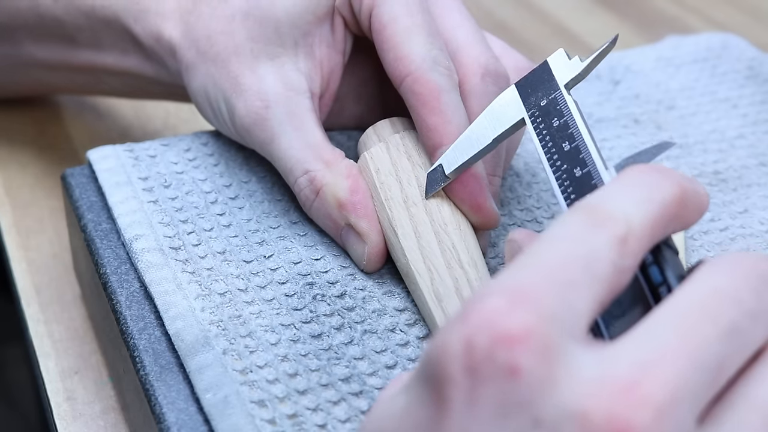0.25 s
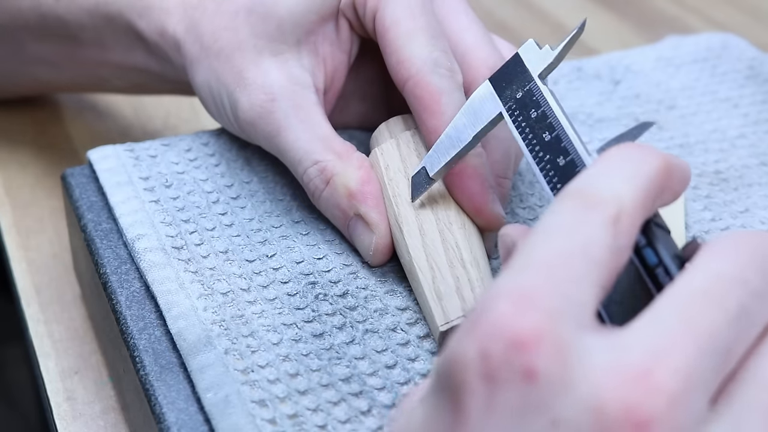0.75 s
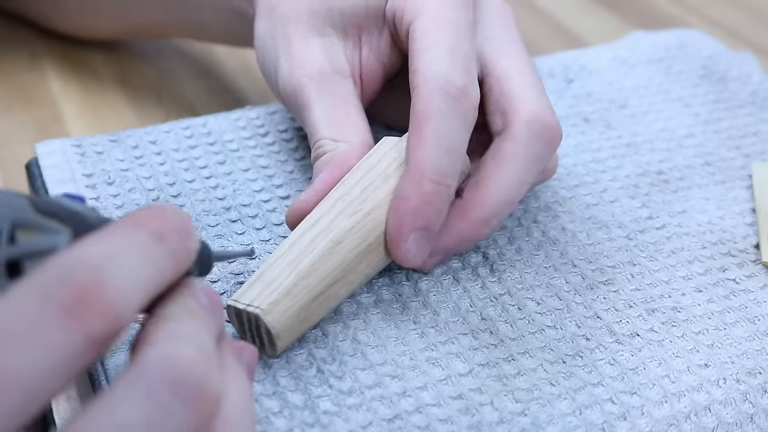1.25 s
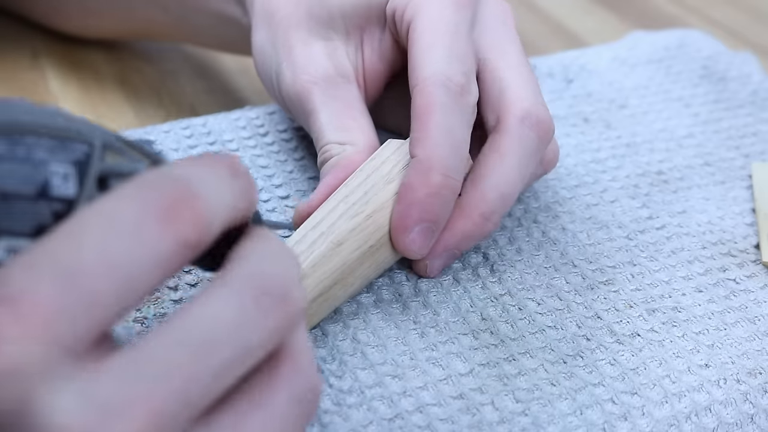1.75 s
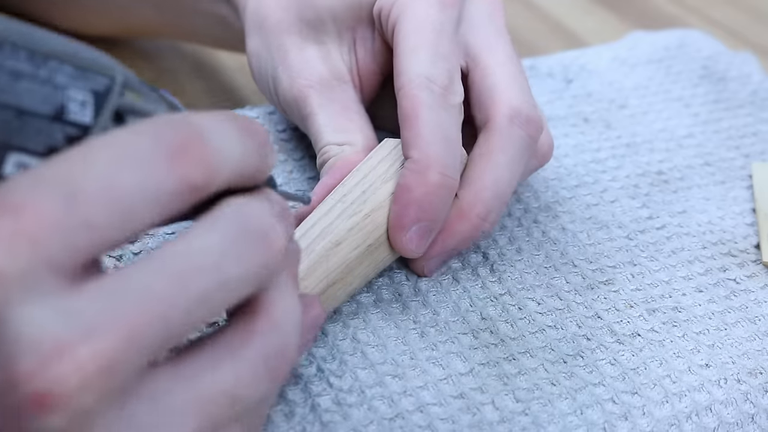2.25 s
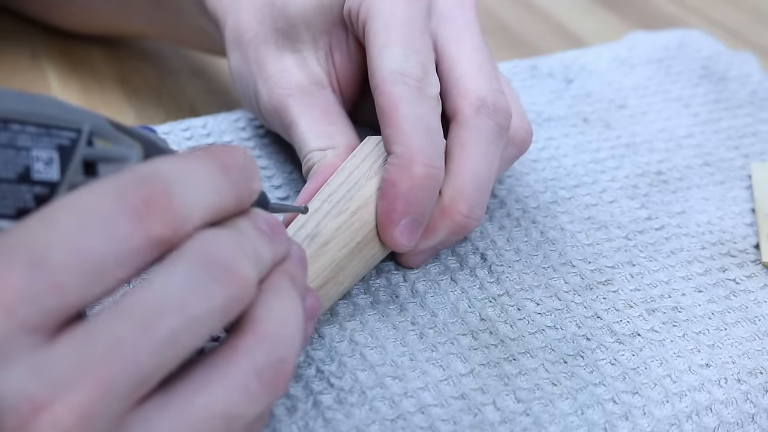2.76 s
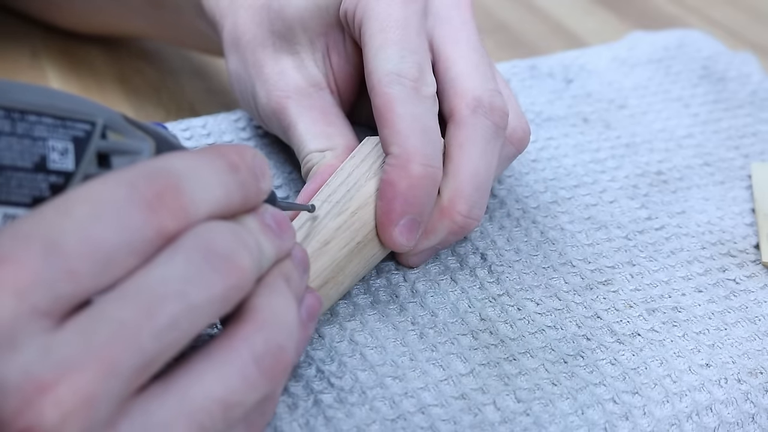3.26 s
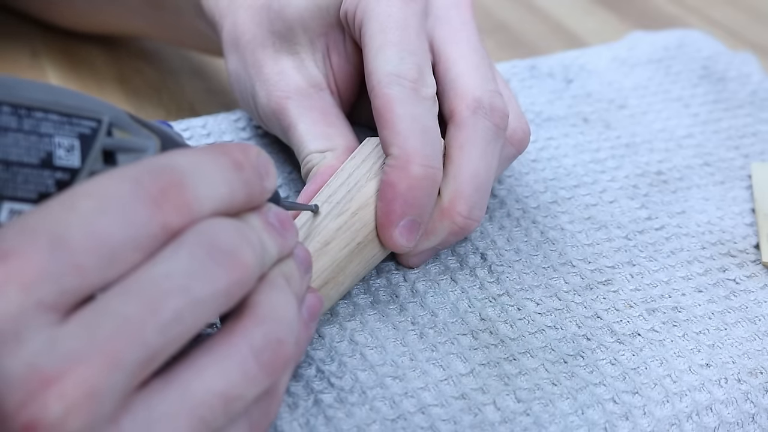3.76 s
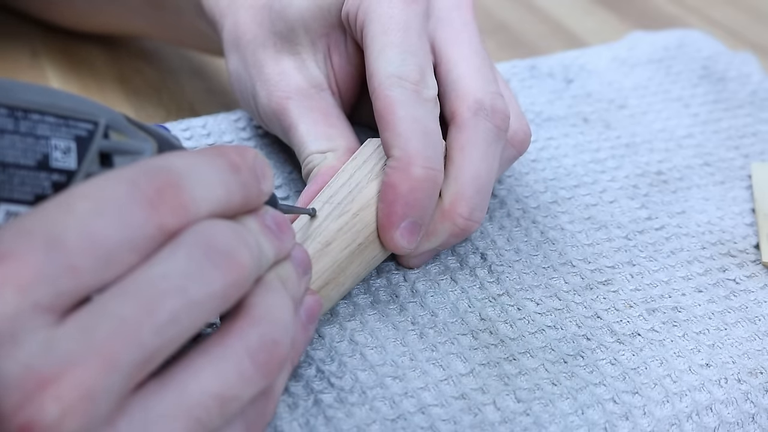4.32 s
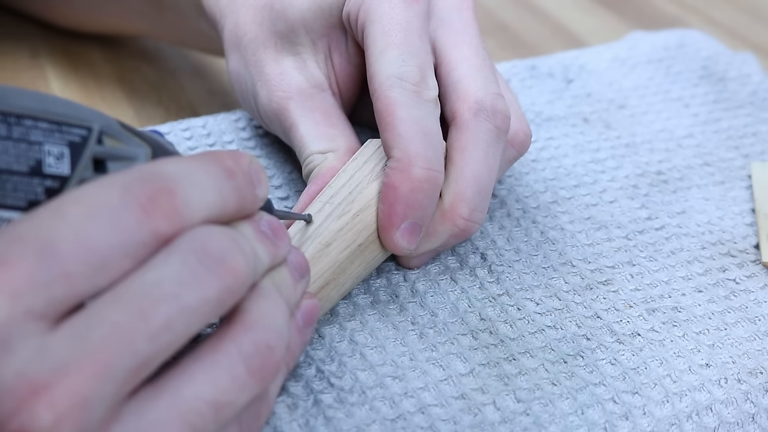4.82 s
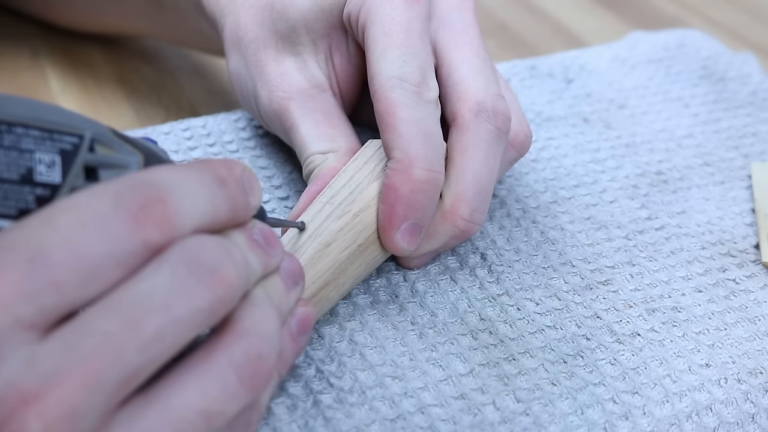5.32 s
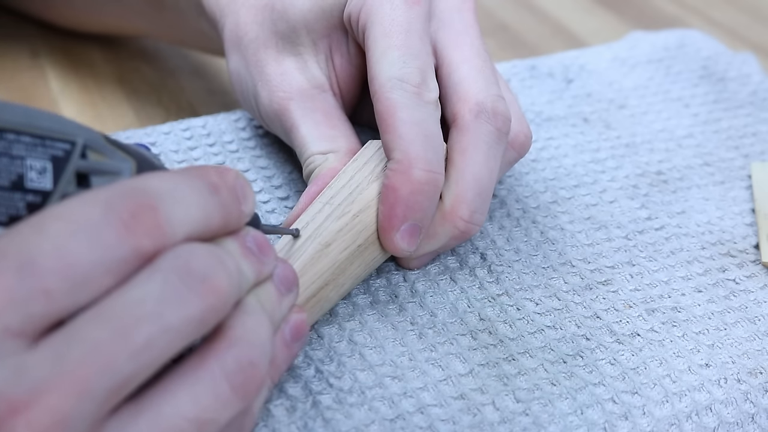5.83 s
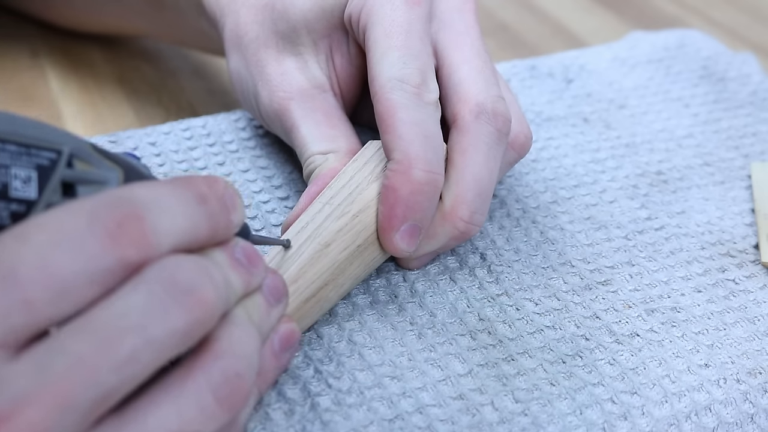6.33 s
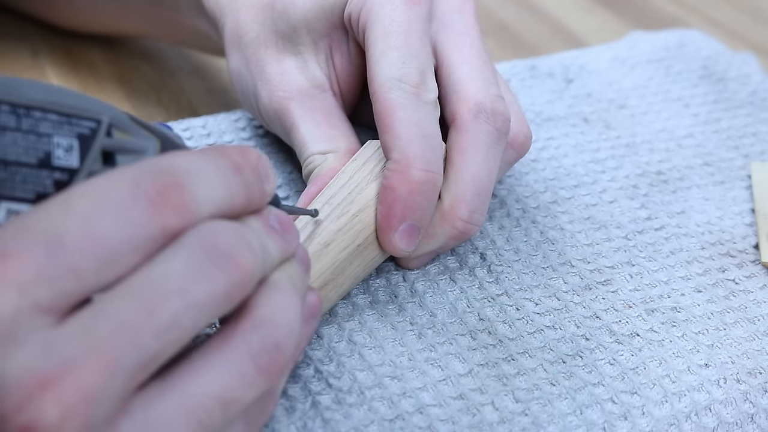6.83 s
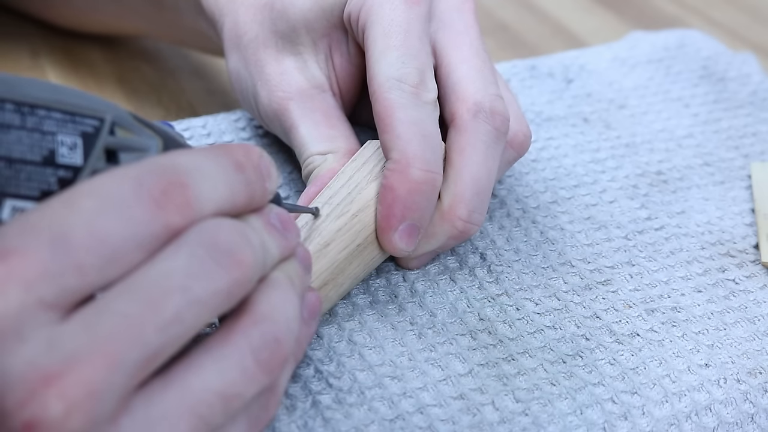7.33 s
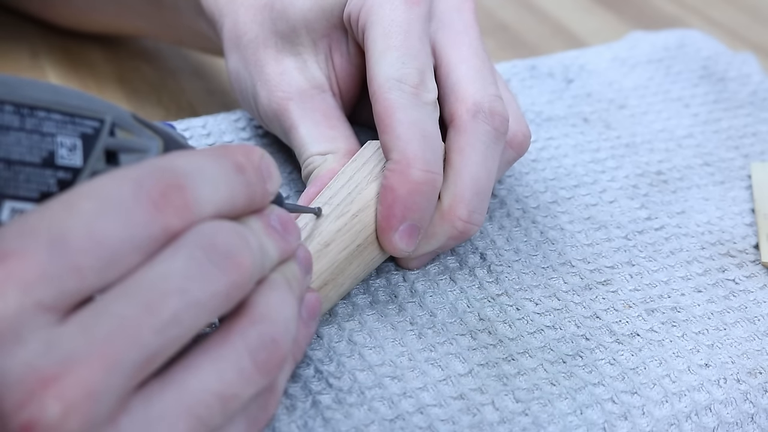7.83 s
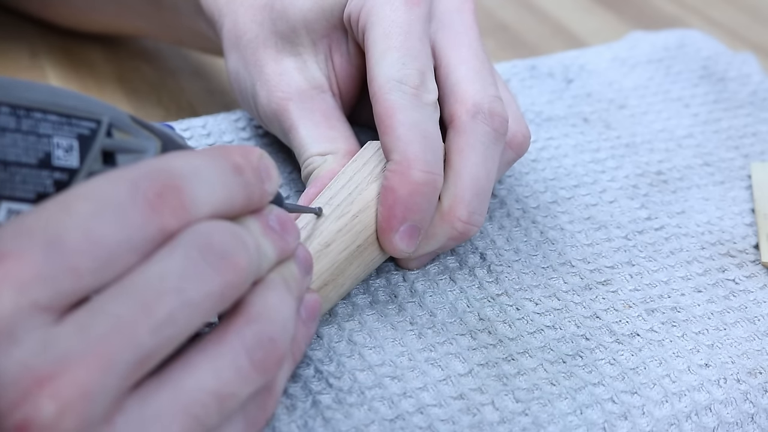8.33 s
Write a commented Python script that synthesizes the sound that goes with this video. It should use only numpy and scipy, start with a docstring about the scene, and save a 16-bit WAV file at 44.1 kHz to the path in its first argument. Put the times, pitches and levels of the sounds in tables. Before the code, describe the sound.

Close stereo pickup at a workshop bench. About a second of quiet room tone, faint hum and two tiny touches on wood, then an abrupt cut to a shrill rotary tool already running, with rushing air. After a brief touch, its bit grinds into a wooden block, buzzing and chattering as the pitch sags; it lifts, recovers, and bites again. Soft hand thuds sit underneath.

```python
"""A workshop bench: it is quiet at first, with room tone, a faint hum and two light touches on wood.
Abruptly a handheld rotary tool runs at about 14 700 rpm: fan and commutator whine on multiples of the
shaft speed over a rush of cooling air. After a brief touch the burr is twice pressed into a small wooden
block: one main blow a turn excites modes of block and bit, and the shaft speed sags.
The hands thud and rumble dully on the towel-covered bench."""
import sys
import numpy as np
from scipy import signal
from scipy.fft import rfft, irfft
from scipy.io import wavfile

SR = 44100
rng = np.random.default_rng(int(sys.argv[2]) if len(sys.argv) > 2 else 0)


def transcribe(u):
    """Save the signal u as a 16-bit wav file named by the first command-line argument.

    u: samples, shape (n,) or (channels, n), limited to [-1, 1]; the rate is SR.
    q: integer samples, one column per channel.
    """
    v = np.clip(np.atleast_2d(u).T, -1, 1)
    q = np.round(v * 32767).astype(np.int16)
    wavfile.write(sys.argv[1], SR, q)


N = 378378
TIME, BINS = np.arange(N) / SR, np.fft.rfftfreq(N, 1 / SR)  # seconds, Hz


def gain_of(db):
    """Level law: decibels to an amplitude ratio."""
    return 10 ** (np.asarray(db) / 20)


def evened(x):
    """Normalisation: scales a signal to rms 1."""
    return x / np.sqrt(np.mean(x ** 2) + 1e-20)


def curve(rows):
    """Linear interpolation: the columns of a time table at every sample."""
    s, *columns = np.transpose(rows)
    return np.array([np.interp(TIME, s, column) for column in columns])


def spectrum(rows):
    """Interpolation over log frequency: the columns of a frequency table at every bin."""
    hz, *columns = np.transpose(rows)
    return np.array([np.interp(np.log(BINS + 1), np.log(hz), column) for column in columns])


def wander(rate_hz):
    """Band-limited noise: smooth chance of rms 1 that moves about rate_hz times a second."""
    count = int(N / SR * 2 * rate_hz) + 4
    points = signal.resample_poly(rng.standard_normal(count), up=8, down=1)
    return evened(np.interp(TIME, np.linspace(0, N / SR, len(points)), points))


def held(start, end, rise_s, fall_s):
    """Trapezoidal envelope: rises from start, tops out at 1 at most and falls after end."""
    rise = (TIME - start) / rise_s
    fall = 1 - (TIME - end) / fall_s
    return np.clip(np.minimum(rise, fall), 0, 1)


# Left-right likeness of diffuse sound: pitch_hz, likeness (0 to 1)
LIKENESS = [(60, 0.69), (350, 0.58), (1300, 0.61), (2200, 0.63), (3600, 0.11), (7000, 0.14), (12000, 0.058)]


def diffuse(gain, lead_ms=0.):
    """Partial coherence: coloured noise, partly alike at two microphones, the left reached first."""
    left, other = rfft(rng.standard_normal((2, N)))
    same = np.clip(spectrum(LIKENESS)[0], 0, 1)
    right = same * left + np.sqrt(1 - same ** 2) * other
    right = right * np.exp(-2j * np.pi * BINS * lead_ms * 1e-3)
    return irfft(np.array([left, right]) * gain, N)


def ring(drive, modes, order=1):
    """Modal resonance: a drive excites parallel modes; a higher order steepens their skirts; rms 1."""
    body = 0
    for hz, width, db in modes:
        detuning = (BINS ** 2 - hz ** 2) / (width * BINS + 1e-9)
        body = body + gain_of(db) / (1 + 1j * detuning) ** order
    return evened(irfft(rfft(drive) * body, N))


def tone(angle, lag, order):
    """Order tracking: a sine locked to the shaft angle at both microphones, rms 1, the right lagging."""
    phase = np.array([[0], [-lag]]) + rng.uniform(0, 2 * np.pi)
    return np.sqrt(2) * np.cos(order * angle + phase)


FREE_HZ = 246.5  # reference shaft speed, running free
# Shaft speed: time_s, speed_hz (turns a second)
SPEED = [(1.1, 245.47), (1.78, 245.77), (2.51, 246.6), (3.06, 246.39), (3.74, 246.48), (4.12, 246.13),
         (4.69, 244.63), (5.3, 241.61), (5.85, 237.34), (6.04, 235.46), (6.43, 233.78), (6.73, 238.9),
         (7.09, 242.56), (7.43, 243.86), (7.8, 243.48), (8.3, 243.66), (8.57, 242.12)]


def shaft():
    """Phase integration: shaft angle (radians) from its speed, and the sag below free running (Hz)."""
    speed = curve(SPEED)[0]
    return 2 * np.pi * np.cumsum(speed) / SR, FREE_HZ - speed


# Loud whines: order (multiple of shaft speed), right_re_left_db, sag_db_per_hz, in_wood_db
WHINES = [(16, -2, -0.71, -5), (18, -5, -0.52, -1.25), (32, -7.5, -1.29, -0.7)]
# Lag of each whine at the right microphone: lag_rad
WHINE_LAGS = [1.8, 1.2, 4.3]
# Whines swell and fade as the hand turns the tool: time_s, then level_db of each, in the order of WHINES
AIM = [(1.1, -41.5, -43.5, -47), (1.3, -40.5, -46.5, -50), (1.65, -40.5, -47.5, -39.5),
       (1.97, -50, -44.5, -45), (2.2, -55, -44.5, -50), (2.5, -45, -47.5, -41.5), (2.85, -43.5, -45, -43),
       (3.3, -40.5, -43, -45.5), (4.1, -40, -42, -45), (5.05, -37.5, -39.5, -43.5), (6.7, -40, -40.5, -36),
       (7.3, -35.5, -41.5, -41), (8.5, -41, -40, -39.0)]


def whines(angle, sag_hz, load, aim_db, shake_db=1.6):
    """Order-locked radiation: three loud whines change with sag and become unsteady under load."""
    out = np.zeros((2, N))
    for (order, right_db, sag_db, load_db), level_db, lag in zip(WHINES, aim_db, WHINE_LAGS):
        shake = shake_db * np.array([wander(6), wander(6)])
        whine_db = level_db + sag_db * sag_hz + load * (load_db + shake) + [[0], [right_db]]
        out += gain_of(whine_db) * tone(angle, lag, order)
    return out


# Weaker motor tones, before their swells: order (multiple of shaft speed), left_db, right_db, right_lag_rad
ORDERS = [(2, -74, -76, -0.1), (8, -59, -58, 1.6), (9, -67, -69, 1.9), (10, -73, -73, 1.6),
          (17, -53, -64, 2.5), (21, -61, -67, 2.5), (24, -50, -55, -3.1), (25, -51, -56, 3.0),
          (27, -52, -55, 2.7), (31, -59, -64, -1.4), (33, -52, -57, -2.4), (35, -56, -60, -0.4),
          (36, -54, -65, -0.2), (37, -57, -73, -1.8), (38, -60, -71, -2.2), (39, -60, -67, -2.0),
          (40, -52, -63, -0.7), (41, -54, -58, -0.6), (42, -56, -75, -2.0), (45, -63, -73, -1.1),
          (48, -52, -69, 2.8), (49, -60, -72, -2.2), (54, -63, -65, -0.4), (55, -62, -65, -1.2),
          (56, -52, -60, -1.3), (57, -58, -72, -1.0)]
# Softening of the lower and higher weak tones: free_db, sag_db_per_hz, in_wood_db
LOW_TONES = (0.3, -0.47, -3.3)
HIGH_TONES = (-0.5, -0.11, -1.8)


def motor_tones(angle, sag_hz, load, aim_db, pulsing, fade_db=2.0, quiver_db=2, faint_db=-61,
                faint_right_db=-66.5, rolloff_db=-0.35, flex_db=4.5, buzz=1.0, follow=0.2):
    """Harmonic series: weaker multiples of the shaft speed, softer and less steady under load."""
    tones = {order: rest for order, *rest in ORDERS}
    loud = {row[0] for row in WHINES}
    for order in sorted(set(range(22, 65)) - loud):  # fill in faintly the multiples not listed
        dull_db = rolloff_db * max(order - 46, 0)
        lag = rng.uniform(0, 2 * np.pi)
        tones.setdefault(order, (faint_db + dull_db, faint_right_db + dull_db, lag))
    low, high = (gain_of(free_db + sag_db * sag_hz + load_db * load)
                 for free_db, sag_db, load_db in (LOW_TONES, HIGH_TONES))
    # the middle tones turn away with the lowest whine
    beam = gain_of(follow * (aim_db[0] - np.median(aim_db[0])))
    out = np.zeros((2, N))
    for order, (left_db, right_db, lag) in tones.items():
        swell = low if order < 44 else high
        swell = swell * gain_of(fade_db * wander(1.5) + quiver_db * load * wander(6))
        if order == 2:
            swell = swell * gain_of(flex_db * load)  # the loaded shank flexes twice a turn
        if 16 < order < 30:
            swell = swell * beam
        if order == 8:
            swell = swell * (1 + buzz * pulsing)  # the armature slots buzz with the current
        out += gain_of([[left_db], [right_db]]) * swell * tone(angle, lag, order)
    return out


RIPPLE_HZ = 120  # pulsing of the torque with the mains


def motor(angle, sag_hz, load, ripple_rad=.005, bearing_db=-59):
    """Phase modulation: mains torque ripple rocks the shaft whose multiples fan and commutator sing."""
    pulsing = np.cos(2 * np.pi * RIPPLE_HZ * TIME)
    angle = angle + ripple_rad * pulsing
    aim_db = curve(AIM)
    out = whines(angle, sag_hz, load, aim_db)
    out += motor_tones(angle, sag_hz, load, aim_db, pulsing)
    out += gain_of(bearing_db) * tone(angle, 2.7, order=16.3)  # a bearing sings between the multiples
    return out + gain_of([[-74], [-68]]) * pulsing


# Cooling air before the rush and hiss trims: pitch_hz, left_db_per_hz, right_db_per_hz
AIR = [(30, -108, -108), (100, -100, -113.5), (330, -100, -100), (576, -88.5, -89.5), (690, -90, -95),
       (1170, -81.5, -80.5), (1880, -85, -86), (2740, -83.5, -80), (4320, -78.5, -91), (4800, -87, -88),
       (5940, -79, -83), (8100, -80, -80), (8700, -74.5, -90), (11330, -84, -85.5), (15400, -96, -102)]


def air(angle, load, split_hz=5000, flutter=0.057, rush_db=0.14, hiss_db=-4.5, sanding_db=2.0, drift_db=0.6):
    """Flow noise: air rushes from the vents, fluttering once a turn; its hiss grows while the burr sands."""
    density = gain_of(spectrum(AIR)) * np.sqrt(SR / 2)
    upper = 1 / (1 + (split_hz / (BINS + 1)) ** 8)  # share of the power above the split
    rush = diffuse(density * np.sqrt(1 - upper), lead_ms=0.063) * gain_of(rush_db)
    hiss = diffuse(density * np.sqrt(upper), lead_ms=0.039)
    hiss = hiss * gain_of(hiss_db + sanding_db * load + drift_db * wander(3))
    return (rush + hiss) * (1 + flutter * np.cos(angle))


# Burr meets wood, before the pushes and side levels:
# start_s, end_s, first_drone_db, last_drone_db, chatter_db
CUTS = [(3.875, 3.92, -70, -70, -43.5), (4.105, 6.43, -55.5, -49, -45.5), (7.064, 7.362, -58, -57.5, -44.5),
        (7.353, 8.6, -54, -50.5, -47)]
# Pushes of the hand within a cut: middle_s, length_s, extra_drone_db, extra_chatter_db (both at the middle)
PUSHES = [(4.33, 0.1, 2, 2.5), (4.49, 0.09, 2.5, 3), (4.647, 0.19, 1, 4.5), (4.83, 0.18, 0, 3.5),
          (4.986, 0.16, -0.5, 6.5), (5.34, 0.53, 1.5, 2), (5.56, 0.13, -1.5, 4), (5.82, 0.45, -0.5, 4.5),
          (6.133, 0.34, 0, 2), (6.347, 0.16, 2, -1.5), (7.602, 0.16, 6.5, 4.5), (7.86, 0.2, 5, 2.5),
          (8.13, 0.12, 3.5, 3), (8.25, 0.087, 4.5, 5), (8.425, 0.24, 6.5, 3.5)]
ENTER_S, LIFT_S = 0.062, 0.047


def pressure():
    """Contact loading: summed contact (1 when fully held), and the drone and chatter gains it gives."""
    contact, drone, chatter = np.zeros((3, N))
    for start, end, first_db, last_db, chatter_db in CUTS:
        touch = held(start, end, ENTER_S, LIFT_S)
        contact += touch
        drone += touch * gain_of(np.interp(TIME, [start, end], [first_db, last_db]))
        chatter += touch * gain_of(chatter_db)
    for middle, length, drone_db, chatter_db in PUSHES:
        near = abs(TIME - middle) < length / 2
        arch = np.cos(np.pi * (TIME[near] - middle) / length)
        drone[near] *= gain_of(drone_db * arch)
        chatter[near] *= gain_of(chatter_db * arch)
    return contact, drone, chatter


def strikes(angle, slip, uneven_db):
    """Periodic impact: one blow a turn; the contact point slips (in turns) and the grain varies its force."""
    turns = angle / (2 * np.pi) + slip
    at = np.flatnonzero(np.diff(np.floor(turns)) > 0)
    # each blow is shared between two samples, to fall at its exact moment
    late = (np.ceil(turns[at]) - turns[at]) / (turns[at + 1] - turns[at])
    force = gain_of(uneven_db * rng.standard_normal(len(at)))
    blows = np.zeros(N)
    blows[at], blows[at + 1] = force * (1 - late), force * late
    return blows


# Where the burr works: time_s, place (0 on the face of the block to 1 at its edge)
PLACE = [(4.8, 0.025), (5.2, 0.49), (5.65, 0.76), (5.8, 0.98), (6.45, 0.97), (7.0, 0.03), (7.4, 0.3)]
# Modes of the held block, struck on the face and at the edge: pitch_hz, width_hz, relative level_db
BLOCK_FACE = [(495, 106, -7), (734.3, 41, -4), (965, 42, -2), (1200, 100, -6.5), (1724, 210, -2),
              (1963, 270, 0.5), (2200, 310, -1)]
BLOCK_EDGE = [(235, 40, -19), (460.2, 27.5, -13.5), (703, 65, -15.5), (962.5, 60, -1), (1178, 164, 0),
              (1415, 69, -3.5), (1642, 150, 0)]
# Modes of the bit in its collet, cutting the face and the edge: pitch_hz, width_hz, relative level_db
BIT_FACE = [(2947, 340, -5), (3413, 260, -0.5), (3730, 430, 0), (4165, 430, -10), (5500, 640, -6.5),
            (6700, 1300, -40), (9140, 630, -8)]
BIT_EDGE = [(2410, 500, -6.5), (3188, 380, 2), (3560, 820, -2.5), (4020, 390, -3.5), (5680, 620, -1.5),
            (6300, 2500, -9), (8850, 570, -7.5)]


def cut(angle, drone_gain, chatter_gain, tremor_db=0.96, second_flute=0.6, dust=0.11):
    """Forced vibration: the blows make the block drone and the bit chatter, while fibres tear."""
    edge = np.clip(curve(PLACE)[0], 0, 1)
    face, edge = np.sqrt(1 - edge), np.sqrt(edge)  # equal-power blend
    knocks = strikes(angle, 0.014 * wander(8), uneven_db=0.6)
    drone = face * ring(knocks, BLOCK_FACE, order=2) + edge * ring(knocks, BLOCK_EDGE, order=2)
    drone *= drone_gain * gain_of(tremor_db * wander(10))  # the hand trembles
    blows = strikes(angle, .009 * wander(7) + .0015 * wander(90), uneven_db=2.)
    # the opposite flute grazes the wood about half a turn away
    grazes = strikes(angle, .45 + .025 * wander(6), uneven_db=3.)
    blows += second_flute * grazes
    turn_phase = angle / (2 * np.pi) % 1
    tearing = rng.standard_normal(N) * np.exp(-turn_phase / 0.33)  # dies away through each turn
    drive = evened(blows) + dust * evened(tearing)
    chatter = face * ring(drive, BIT_FACE, order=2) + edge * ring(drive, BIT_EDGE, order=2)
    chatter *= chatter_gain
    shaded = signal.lfilter([.7, .3], 1, np.roll(chatter, 3))  # later and duller at the right
    return gain_of([[-1.], [0.]]) * drone + gain_of([[0.], [1.]]) * np.array([chatter, shaded])


# Firm bumps of the hands, before the side levels: start_s, peak_db, pitch_hz
BUMPS = [(2.026, -42, 125), (2.556, -52, 109), (3.048, -44.5, 174), (3.552, -43.5, 133),
         (4.577, -45.5, 158), (5.271, -52, 119), (5.479, -45.5, 121), (5.952, -46, 134), (6.97, -45, 106),
         (7.885, -47, 118), (8.321, -42, 137)]
# Shifts of the grip, before the rumble and side levels: start_s, length_s, level_db
SHIFTS = [(1.22, 0.1, -63), (1.456, 0.11, -64), (1.691, 0.054, -59), (1.85, 0.19, -60.5),
          (2.545, 0.065, -60), (2.655, 0.12, -68), (3.283, 0.097, -66), (3.487, 0.092, -61),
          (3.793, 0.095, -62), (4.15, 0.2, -63), (4.487, 0.1, -58), (4.81, 0.26, -64.5), (5.21, 0.067, -64),
          (5.45, 0.078, -61), (5.82, 0.19, -60), (6.567, 0.072, -61), (6.947, 0.051, -61), (7.3, 0.4, -65),
          (7.85, 0.2, -63), (8.28, 0.18, -60.5)]
# RESTING_DB is the rumble between shifts, before the same levels
SHIFT_RISE_S, SHIFT_FALL_S, RESTING_DB = 0.012, 0.052, -75


def bench(rise_s=0.0061, left_lag_ms=0.85, left_db=-9, right_db=4, rumble_db=-2.0):
    """Damped impact: soft thuds through the towel, and low-pitched noise as the restless hands rumble."""
    thuds, t = np.zeros(N), np.arange(SR // 5) / SR
    for start, db, hz in BUMPS:
        cycle = 2 * np.pi * hz * t
        swing = np.sin(cycle) + 0.45 * np.sin(rng.uniform(1.45, 2.12) * cycle) + 0.29 * np.sin(cycle / 2)
        thud = swing * t / rise_s * np.exp(-t / rise_s)
        part = thuds[round(start * SR):][:len(t)]
        part += (gain_of(db) * thud / abs(thud).max())[:len(part)]
    # pitch_hz, relative level_db
    dull = [(20, -28), (55, 2), (130, -2.0), (200, -8.5), (400, -20.5), (2000, -72)]
    rumble = evened(diffuse(gain_of(spectrum(dull))))
    shifting = sum(gain_of(db) * held(start, start + length, SHIFT_RISE_S, SHIFT_FALL_S)
                   for start, length, db in SHIFTS)
    rumble *= (gain_of(RESTING_DB) + shifting) * gain_of(rumble_db + 2.05 * wander(15))
    left, right = thuds + rumble
    left = np.interp(TIME - left_lag_ms * 1e-3, TIME, left)
    return np.array([left, right]) * gain_of([[left_db], [right_db]])


# The still workshop: pitch_hz, relative level_db_per_hz
ROOM_TONE = [(20, -28), (60, -6.5), (100, -8), (160, -13.5), (230, -6), (330, -12), (460, -13.5),
             (620, -16), (900, -20), (2000, -25.5), (4000, -26.5), (12000, -32), (13500, -42), (15500, -52)]
ROOM_DB = -59.5  # rms
# A faint hum: starting pitch, upward creep, mean level
HUM_HZ, HUM_RISE_HZ_PER_S, HUM_DB = 386, 21, -67
# Light touches of the callipers on the wood: start_s, level_db (at the envelope's peak), pitch_hz, width_hz
TOUCHES = [(0.055, -63.5, 2500, 7000), (1.045, -63, 590, 160)]


def workshop(touch_s=0.0078, waver_hz=7, waver_db=4.5):
    """Diffuse field: room tone with a faint, wavering, rising hum, and callipers brushing the wood."""
    out = gain_of(ROOM_DB) * evened(diffuse(gain_of(spectrum(ROOM_TONE))))
    hum_db = HUM_DB + waver_db * wander(5.8)
    hum_hz = HUM_HZ + HUM_RISE_HZ_PER_S * TIME + waver_hz * wander(14)
    out += gain_of(hum_db) * evened(np.sin(2 * np.pi * np.cumsum(hum_hz) / SR))
    for start, db, hz, width in TOUCHES:
        age = np.maximum(TIME - start, 0) / touch_s
        brush = ring(rng.standard_normal(N), [(hz, width, 0)])
        out += gain_of(db) * age * np.exp(1 - age) * brush
    return out


START_S = 1.0905  # the tool is heard from here on


def scene():
    """Superposition: the tool and bench sounds add up, and replace the still room within 2 ms."""
    angle, sag_hz = shaft()
    load, drone_gain, chatter_gain = pressure()
    tool = motor(angle, sag_hz, load) + air(angle, load) + cut(angle, drone_gain, chatter_gain)
    running = np.clip((TIME - START_S) / .002, 0, 1)
    return (1 - running) * workshop() + running * (tool + bench())


EDGE_HZ = 15750  # low-pass cutoff


def record(dry):
    """Band limitation: the recorder's linear-phase low-pass filter."""
    lowpass = signal.firwin(511, EDGE_HZ, window=("kaiser", 9), fs=SR)
    return signal.oaconvolve(dry, lowpass[None], "same")


dry = scene()
out = record(dry)
transcribe(out)
```